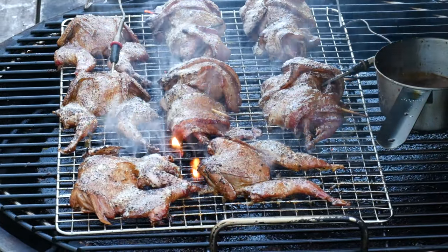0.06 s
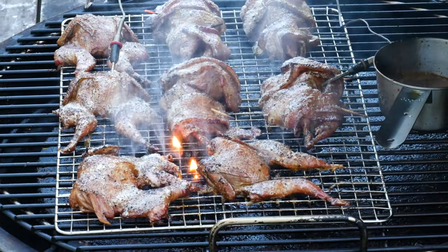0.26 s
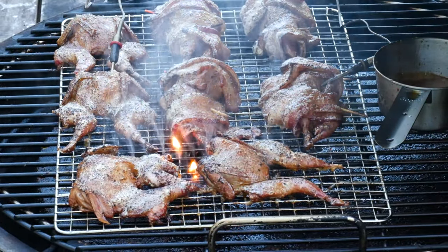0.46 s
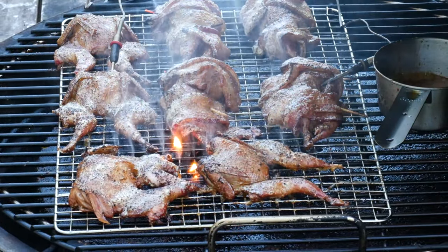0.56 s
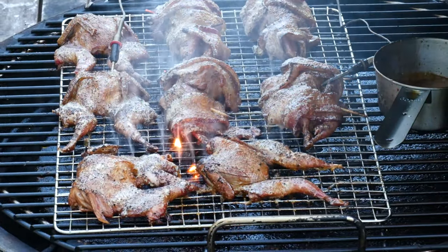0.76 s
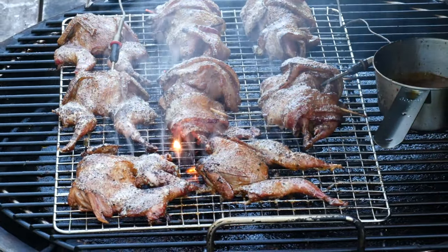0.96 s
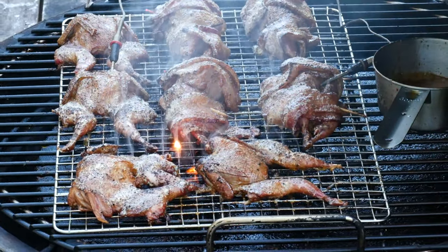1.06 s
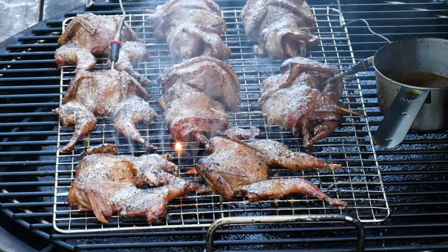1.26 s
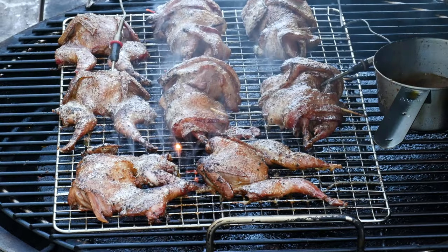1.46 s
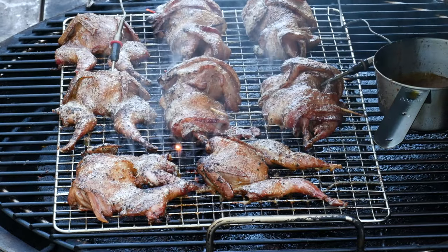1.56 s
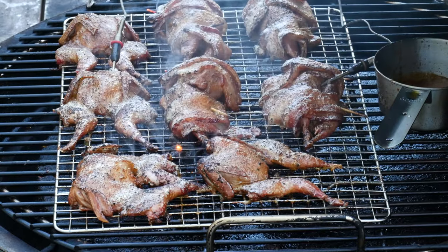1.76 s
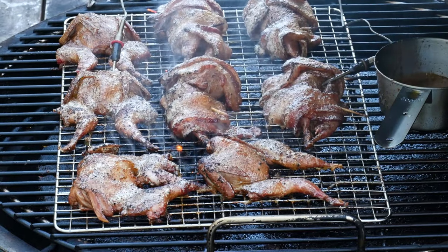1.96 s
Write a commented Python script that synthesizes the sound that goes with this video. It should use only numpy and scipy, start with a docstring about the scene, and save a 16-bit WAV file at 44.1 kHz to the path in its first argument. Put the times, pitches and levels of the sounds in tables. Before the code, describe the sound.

A grill fire flares up in one dull, rushing whoosh that buffets the close microphone and quickly dies away. Meat sizzles faintly throughout, with small sharp pops of fat and a low fire rumble outdoors.

```python
"""Flare-up on an outdoor grill

Fat flares up: a turbulent rush of air swells, buffets the microphone, excites hollow resonances and
dies away with a faint whistle. The meat sizzles in countless tiny bursts, and sharper pops of fat
echo briefly off the grill. Underneath, the fire rumbles in the murmur of the open air."""
import sys
import numpy as np
from scipy import signal
from scipy.fft import rfft, irfft
from scipy.io import wavfile
from scipy.ndimage import uniform_filter1d

SR = 44100
rng = np.random.default_rng(int(sys.argv[2]) if len(sys.argv) > 2 else 0)


def wav_record(signal):
    """Record a signal, one row per channel, as 16-bit PCM in the file named by sys.argv[1]."""
    frames = np.transpose(np.atleast_2d(signal))
    bounded = np.clip(frames, -1, 1)
    # unit amplitude maps onto the largest positive 16-bit level
    quanta = np.round(bounded * 32767).astype(np.int16)
    wavfile.write(sys.argv[1], SR, quanta)


N = 88200
TIME = np.arange(N) / SR
HZ = np.fft.rfftfreq(N, 1 / SR)

# Envelope of the rush of air: time_s, level_db
RUSH_ENVELOPE = [(0, -27), (.26, -26), (.31, -22), (.37, -19), (.405, -22), (.468, -10.5), (.545, -10),
                 (.565, -11), (.585, -9.5), (0.631, -11.5), (.69, -17.5), (.742, -32), (.775, -37.5)]
# Spectrum of its dull roar: frequency_hz, relative_db
ROAR_SPECTRUM = [(25, -48), (55, -18), (100, -7), (160, 1.5), (230, -0.5), (290, -5.5), (420, -5),
                 (530, -7.5), (720, -10), (1000, -15.5), (1310, -12), (1450, -27), (2600, -32.5),
                 (3100, -24), (3400, -27.5), (4000, -35), (8000, -48), (16000, -56)]
# Spectrum of the rasp in the strongest flow: frequency_hz, relative_db
RASP_SPECTRUM = [(200, -7), (700, 10), (1300, 2.5), (1600, 2.5), (2100, -0.5), (2750, -4.5), (2950, -6),
                 (3400, -36), (3900, -27), (5500, -21.5), (7500, -24), (13000, -22), (16000, -29)]
# Hollow resonances that the air excites: centre_hz, width_hz, lift_db
HOLLOW_RESONANCES = [(232, 30, 3), (391, 20, 4), (439, 22, 4), (694, 28, 5), (917, 30, 9), (1115, 55, 6),
                     (1305, 18, 6), (1518, 30, 6), (2112, 24, 7), (3000, 120, 5), (6880, 260, 10),
                     (10020, 260, 11), (11100, 450, 10)]
# Stereo width of the rush: frequency_hz, side_gain_db
RUSH_SPREAD = [(30, -28), (200, -55), (500, -43), (1000, -33), (1600, -34), (2500, -28), (3200, -23),
               (4500, -11), (8000, -25), (16000, -14)]
# Spectrum of the sizzling fat: frequency_hz, relative_db
SIZZLE_SPECTRUM = [(300, -15), (1200, -4.5), (2200, 5.5), (2850, 5.5), (3330, 10.5), (3750, 3.5), (5000, 1),
                   (7800, 0), (11000, 1), (13500, -1), (15300, -5.5), (16000, -7)]
# Envelope of the sizzle: time_s, gain_db
SIZZLE_ENVELOPE = [(0, -40), (.3, -39.5), (.75, -42), (.95, -41), (1.17, -40.5), (1.27, -43.5),
                   (1.52, -39.5), (1.7, -42.5), (1.82, -41), (2, -40)]
# Bursting drops of fat: start_s, relative_db, treble_tilt_db_per_octave
FAT_POPS = [(0.0883, -13, 3), (0.359, -4, -3), (0.7296, -7.5, -0.5), (0.84, -9.5, -3.5),
            (0.848, -7.5, -5.5), (1.0830, -17, 5), (1.1060, -11.5, -2), (1.1495, -3.5, 2), (1.3005, -14, 7),
            (1.4395, -15, 11), (1.4614, -12, 0), (1.519, -8, 3), (1.5748, -9, 2.5), (1.6293, -9.5, -2.5),
            (1.6660, 0, 0.5), (1.7434, 0, -3.5), (1.8070, -14.5, -8.5), (1.869, -10, 1)]
# Spectrum of a pop before its tilt: frequency_hz, relative_db
POP_SPECTRUM = [(200, -26), (900, 1), (2000, 3), (2700, 7.5), (3250, 14.5), (3900, 1.5), (6000, -1),
                (11000, 4), (14000, 0), (16000, -18)]
# Spectrum of the fire's rumble: frequency_hz, relative_db
RUMBLE_SPECTRUM = [(20, -38), (36, -24), (54, 7), (75, -1), (145, -1), (210, -6), (300, -16.5), (600, -31),
                   (2000, -70)]
# Spectrum of the open air: frequency_hz, relative_db
MURMUR_SPECTRUM = [(20, -21), (150, -14.5), (320, -6.5), (560, -7.5), (700, -3), (800, -1), (970, -3),
                   (1120, -5), (1400, -9), (2500, -17.5), (6000, -29.5), (16000, -48)]
# Stereo width of the fat, fire and open air: frequency_hz, side_gain_db
SCENE_SPREAD = [(30, -25), (100, -23.5), (200, -19.5), (500, -11), (850, -19.5), (2000, -10), (2800, -9),
                (3300, -14.5), (4000, -7), (5000, -11), (6500, -16.5), (8000, -19.5), (16000, -18)]


def air_rush():
    """Turbulence drives hollow resonances; its rasp grows faster than its roar as the flow rises."""
    release_db_per_s, flutter_db, rasp_lead_s = 187, 1.12, 0.019
    times_s, levels_db = np.transpose(RUSH_ENVELOPE)
    level_db = np.interp(TIME, times_s, levels_db) - release_db_per_s * np.maximum(TIME - times_s[-1], 0)
    hollows_db = sum(lift_db / (1 + (2 * (HZ - centre_hz) / width_hz) ** 2)
                     for centre_hz, width_hz, lift_db in HOLLOW_RESONANCES)
    flutter = unit(amp(flutter_db * wander(rate_hz=70.7)))
    roar = even_noise(spectrum(ROAR_SPECTRUM) + hollows_db, RUSH_SPREAD) * flutter * amp(level_db)
    # The rasp and a narrow airy band run just ahead of the roar; the band persists in gentle flow.
    full_flow_db, rasp_growth, airy_growth = -11, 1.68, 0.62
    excess_db = np.interp(TIME + rasp_lead_s, TIME, level_db) - full_flow_db
    rasp = even_noise(spectrum(RASP_SPECTRUM) + hollows_db, RUSH_SPREAD)
    airy = noise(resonance(centre_hz=3210, half_width_hz=220))
    return roar + rasp * amp(-20.5 + rasp_growth * excess_db) + airy * amp(-34.5 + airy_growth * excess_db)


def whistle():
    """Narrow resonance gives noise a pitch: one hollow sings briefly as the rush dies away."""
    peak_s, peak_db, rise_db_per_s, fall_db_per_s = 0.668, -23.5, 250, 214
    since_s = TIME - peak_s
    level_db = peak_db + np.minimum(rise_db_per_s * since_s, -fall_db_per_s * since_s)
    return even_noise(resonance(centre_hz=1305, half_width_hz=40), RUSH_SPREAD) * amp(level_db)


def fat_pops():
    """Each bursting drop of fat is an impulsive source: one sharp snap, then its reflections."""
    out = np.zeros((2, N))
    treble_octaves = np.log2(np.maximum(HZ, 1500) / 6000)
    for start_s, relative_db, tilt_db_per_octave in FAT_POPS:
        tone_db = spectrum(POP_SPECTRUM) + tilt_db_per_octave * treble_octaves
        mid = colour(signal.unit_impulse(N) + grill_echo(), tone_db)
        side = colour(grill_echo(), tone_db)
        snap = amp(relative_db - 9) * stereo(mid, side, SCENE_SPREAD)
        start = round(start_s * SR)
        out[:, start:] += snap[:, :N - start]
    return out


def sizzle():
    """Shot noise: thousands of tiny, independent bursts of fat superpose over a fine hiss."""
    bursts_per_s, size_spread_db, waver_db = 2500, 7, 1.01
    tone_db = spectrum(SIZZLE_SPECTRUM)
    sizes = amp(size_spread_db * np.minimum(rng.exponential(1, N), 4.5))
    clicks = sizes * rng.choice([-1, 1], N) * (rng.random(N) < bursts_per_s / SR)
    mid = unit(colour(clicks + signal.fftconvolve(clicks, grill_echo())[:N], tone_db))
    side = unit(colour(signal.fftconvolve(clicks, grill_echo())[:N], tone_db))
    bursts = amp(-4) * stereo(mid, side, SCENE_SPREAD)
    hiss = amp(-2.5) * even_noise(tone_db, SCENE_SPREAD)
    gain_db = np.interp(TIME, *np.transpose(SIZZLE_ENVELOPE)) + waver_db * wander(rate_hz=35)
    return (bursts + hiss) * amp(gain_db)


def grill_echo():
    """Impulse response around a burst: a short ring, then delayed reflections from the grill."""
    ring = amp(-8) * reflections(delay_s=0, t60_s=0.032)
    echo = amp(-1.5) * reflections(delay_s=0.0025, t60_s=0.077)
    return ring + echo


def fire_rumble():
    """Combustion noise lies at low frequencies and wavers slowly in level, by about a decibel."""
    return even_noise(spectrum(RUMBLE_SPECTRUM), SCENE_SPREAD) * amp(-38 + wander(rate_hz=5.4))


def open_air():
    """Stationary broadband noise forms the murmur of the outdoors."""
    return even_noise(spectrum(MURMUR_SPECTRUM), SCENE_SPREAD) * amp(-39.5)


def amp(db):
    """Amplitude ratio of a level in decibels."""
    return 10 ** (np.asarray(db) / 20)


def unit(x):
    """Normalisation to an rms of one."""
    return x / np.sqrt(np.mean(x ** 2) + 1e-20)


def spectrum(points):
    """Gain in dB, interpolated on a logarithmic frequency axis."""
    hz, db = np.transpose(points)
    return np.interp(np.log(HZ + 1), np.log(hz + 1), db)


def resonance(centre_hz, half_width_hz):
    """Gain in dB of a steep-sided resonance, 6 dB down at one half-width from its centre."""
    return -20 * np.log10(1 + ((HZ - centre_hz) / half_width_hz) ** 2)


def colour(x, gain_db):
    """Minimum-phase filter: folding the cepstrum onto positive time makes the response causal."""
    cepstrum = irfft(np.log(amp(np.maximum(gain_db, -100))), N)
    cepstrum[1:N // 2] *= 2
    cepstrum[N // 2 + 1:] = 0
    return irfft(rfft(x) * np.exp(rfft(cepstrum)), N)


def noise(shape_db):
    """Gaussian noise of the given spectral shape and unit rms."""
    return unit(irfft(rfft(rng.standard_normal(N)) * amp(shape_db), N))


def wander(rate_hz):
    """Random modulation of unit rms, mainly in the two octaves below the given rate."""
    white = rfft(rng.standard_normal(N))
    return unit(irfft(white * (HZ > rate_hz / 4) / (1 + (HZ / rate_hz) ** 4), N))


def stereo(mid, side, spread):
    """Mid-side stereo: an unrelated signal, opposite in sign at the two ears, widens the sound."""
    side = colour(side, spectrum(spread))
    return np.array([mid + side, mid - side])


def even_noise(shape_db, spread):
    """Stereo noise whose mid signal is levelled by its running rms over 50 ms."""
    mid = noise(shape_db)
    running_rms = np.sqrt(uniform_filter1d(mid ** 2, size=2200, mode="wrap"))
    return stereo(mid / running_rms, noise(shape_db), spread)


def reflections(delay_s, t60_s):
    """Diffuse reflections of unit energy, decaying exponentially by 60 dB in t60_s."""
    decay = amp(-60 * np.maximum(TIME - delay_s, 0) / t60_s)
    response = rng.standard_normal(N) * (TIME > delay_s) * decay
    return response / np.linalg.norm(response)


def scene():
    """Superposition: the pressures of the independent sources add."""
    return air_rush() + whistle() + fire_rumble() + open_air() + sizzle() + fat_pops()


def record(dry):
    """Soft saturation rounds the highest peaks; a low-pass filter then limits the bandwidth."""
    ceiling, cutoff_hz = 1.2, 15900
    rounded = dry / (1 + (dry / ceiling) ** 4) ** (1 / 4)
    low_pass = signal.firwin(511, cutoff_hz, window=("kaiser", 9), fs=SR)
    return signal.oaconvolve(rounded, low_pass[None], "same")


dry = scene()
out = record(dry)
wav_record(out)
```